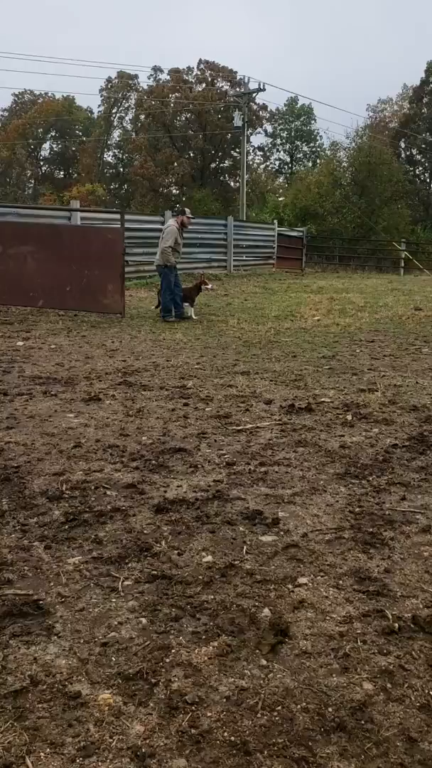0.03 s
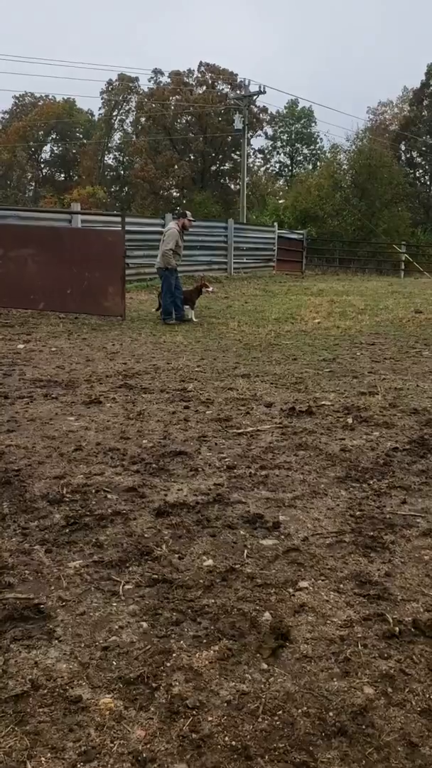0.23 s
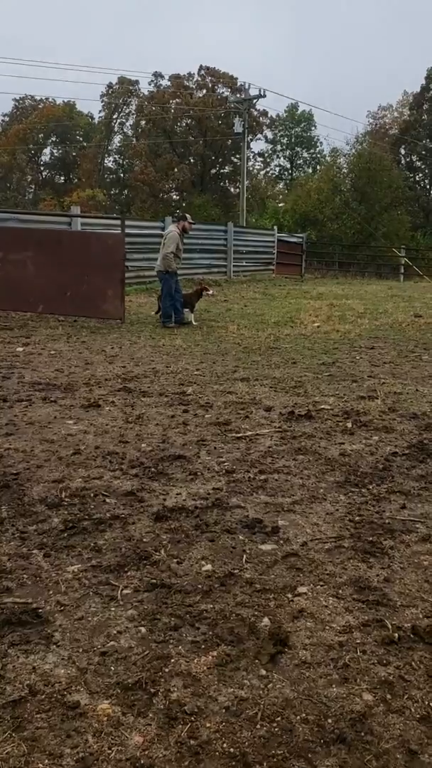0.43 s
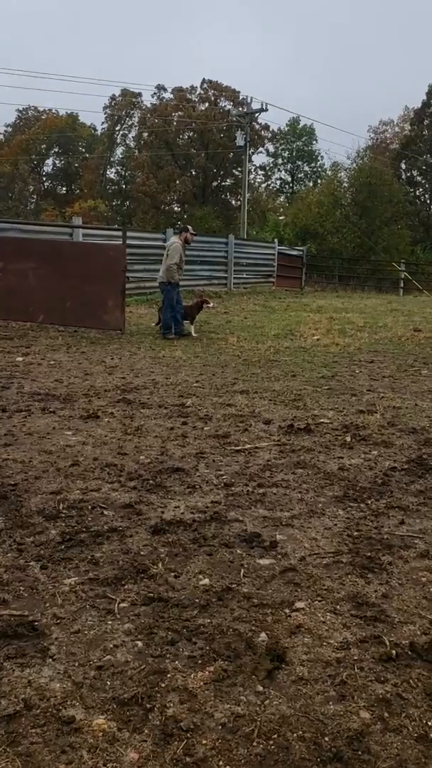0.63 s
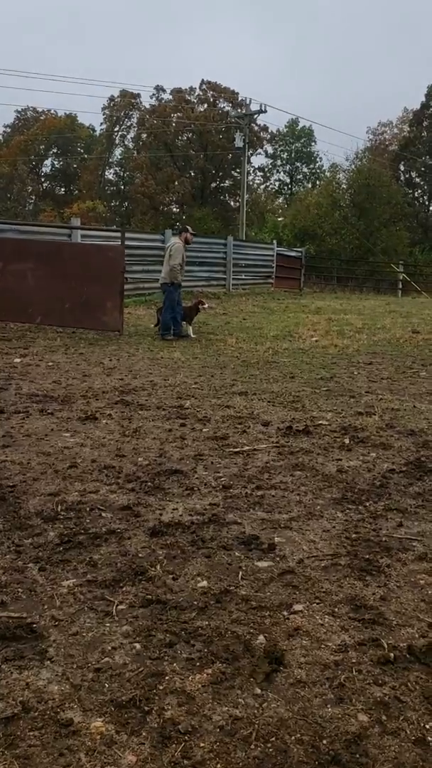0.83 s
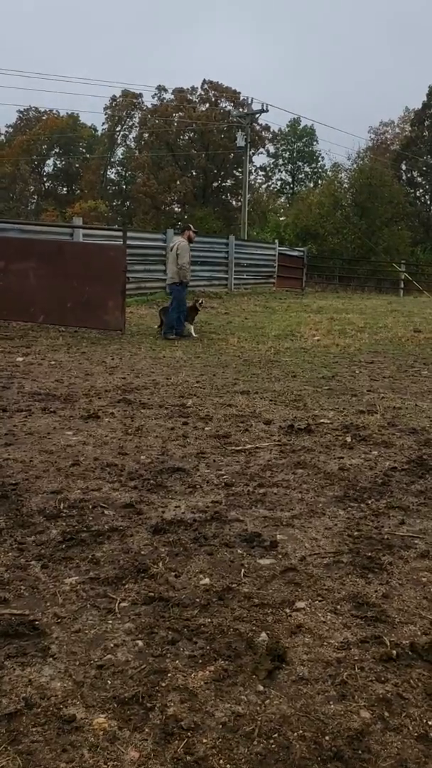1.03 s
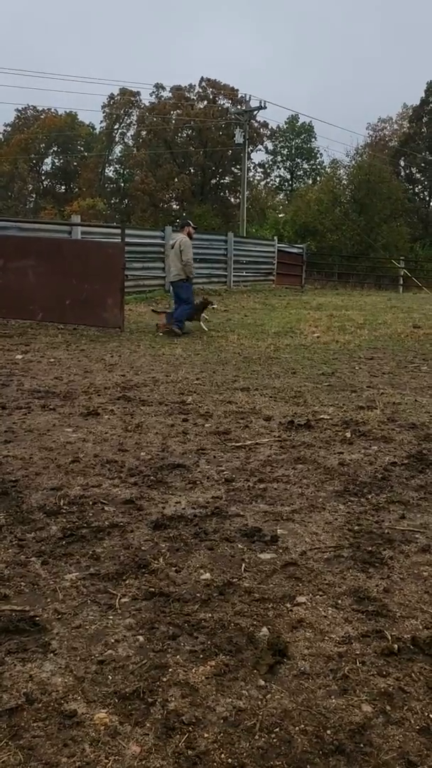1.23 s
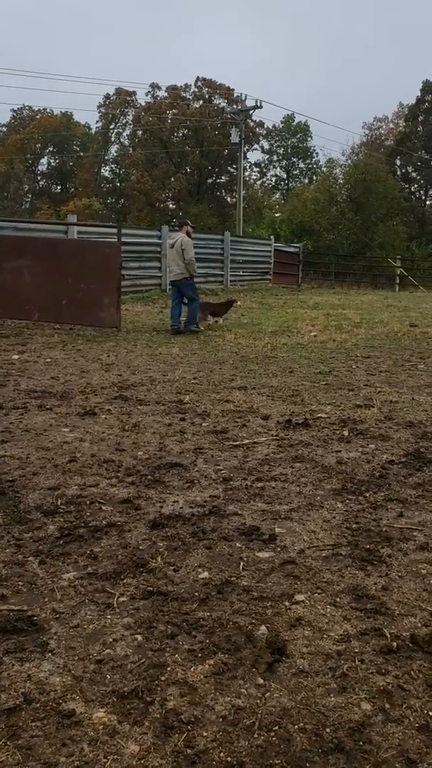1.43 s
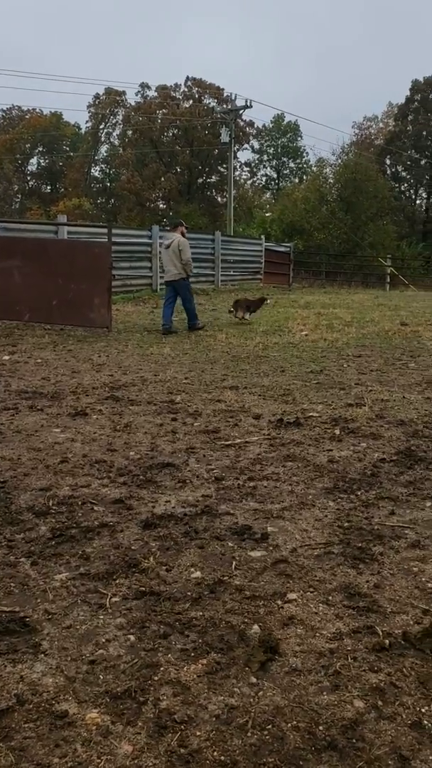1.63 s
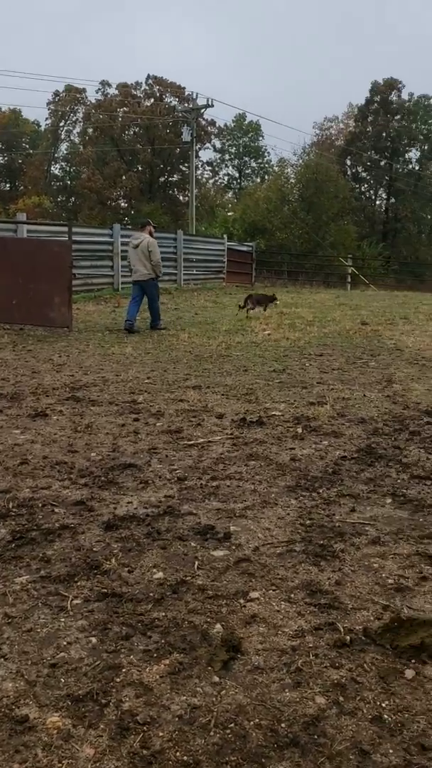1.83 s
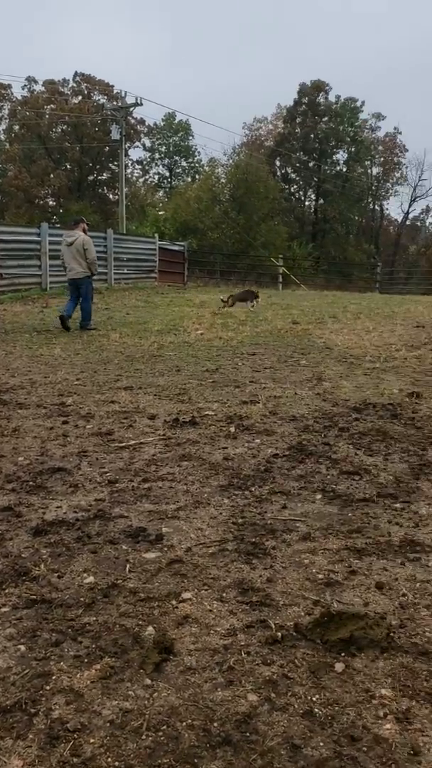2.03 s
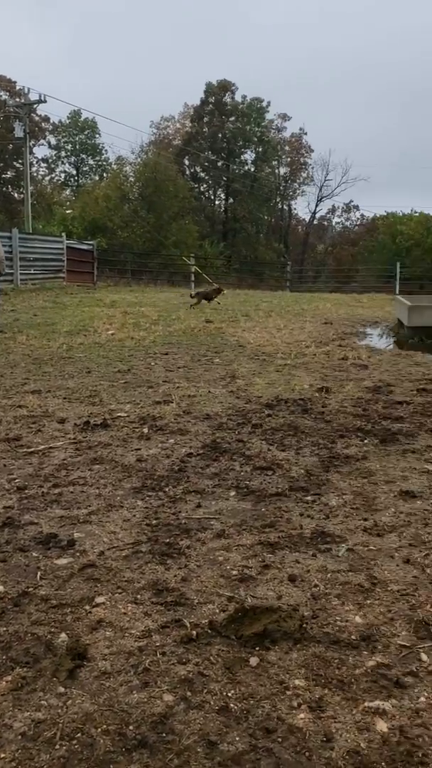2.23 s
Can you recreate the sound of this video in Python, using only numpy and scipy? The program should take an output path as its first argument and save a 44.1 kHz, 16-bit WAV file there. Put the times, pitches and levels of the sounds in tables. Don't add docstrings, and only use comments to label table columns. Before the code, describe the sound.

One cow's moo swells from a closed-mouth hum to a loud call, echoing across a farm lot

```python
import sys
import numpy as np
from scipy import signal
from scipy.fft import rfft, irfft, next_fast_len
from scipy.io import wavfile
from scipy.ndimage import uniform_filter1d, map_coordinates

SR = 44100
rng = np.random.default_rng(int(sys.argv[2]) if len(sys.argv) > 2 else 0)


def dump_mix(stems):
    frames = np.atleast_2d(stems).T
    limited = np.clip(frames, -1, 1)
    pcm = np.round(limited * 32767).astype(np.int16)
    wavfile.write(sys.argv[1], SR, pcm)


def undo_db(level):
    steps = np.asarray(level, float) / 20
    return 10 ** steps


N = 100856
TIME_S = np.arange(N) / SR


def unit(x):
    return x / np.sqrt(np.mean(x ** 2) + 1e-20)


def along(points, hz):
    point_hz, value = np.transpose(points)
    return np.interp(np.log(hz + 1), np.log(point_hz + 1), value)


def curves(rows):
    s, *columns = np.transpose(rows)
    return [uniform_filter1d(np.interp(TIME_S, s, c), size=881, mode="nearest") for c in columns]


def wobble(rate_hz):
    knots = rng.standard_normal(int(N * 400 / SR) + 4)
    return map_coordinates(knots, [np.arange(N) * min(rate_hz, 400) / SR])


def filtered(x, response):
    m = next_fast_len(N + SR)
    return irfft(rfft(x, m) * response(np.fft.rfftfreq(m, 1 / SR)), m)[..., :N]


def hiss(spectrum, channels=1):
    noise = rng.standard_normal((channels, N))
    return unit(filtered(noise, lambda hz: undo_db(along(spectrum, hz))))


# time_s, strength_db
GUSTS = [(0.07, -67.5), (0.1, -59.5), (0.71, -64.5), (1.24, -68.5), (1.26, -55), (1.46, -72.5), (1.53, -49),
         (1.58, -66), (2.06, -54.5), (2.11, -43.5), (2.21, -68.5), (2.28, -48)]
# freq_hz, level_db
THUMP_COLOUR = [(12, -33.5), (22, -9), (45, -14.5), (58, 0), (85, -8.5), (120, -10), (170, -19.5),
                (400, -41.5)]
# freq_hz, level_db
FAR_AIR = [(100, -8.5), (160, -8.5), (230, -31), (800, -38), (4500, -48.5), (8500, -51.5), (12000, -49),
           (15700, -42)]


def wind():
    far_air_db = -69.5
    strength_db, = curves(GUSTS)
    shared, left, right = hiss(THUMP_COLOUR + [(1500, -120)], channels=3)
    lumps = undo_db(0.28 * np.array([wobble(5.8), wobble(62)]))
    pair = np.array([.6 * shared + left, .6 * shared + 1.2 * right])
    thumps = undo_db(strength_db) * unit(lumps * pair)
    return thumps + undo_db(far_air_db) * hiss(FAR_AIR, channels=2)


# time_s, level_db
RUBBING = [(.07, -91), (.71, -86.5), (.78, -69.5), (.87, -68.5), (.92, -78.5), (1.05, -72.5), (1.16, -80),
           (1.2, -68.5), (1.5, -68.5), (1.85, -69), (1.93, -70.5), (2.03, -69.5), (2.08, -72),
           (2.15, -75.5), (2.22, -69.5), (2.29, -67)]
# freq_hz, level_db
FABRIC = [(200, -120), (500, 1), (1600, 3.5), (3700, -5.5), (6500, -4.5), (8600, -13), (11500, -4.5),
          (15700, -2.5)]


def cloth():
    left_db = -16
    swell = undo_db(curves(RUBBING)[0])
    slips = undo_db(0.41 * wobble(7.22) + 0.64 * wobble(81.0))
    return swell * slips * hiss(FABRIC, channels=2) * undo_db(np.array([[left_db], [0]]))


# start_s, peak_db
BUCKLE_TICKS = [
    (1.1964, -53.5),
    (1.4008, -66),
    (1.947, -62),
    (2.015, -49),
]
# freq_hz, level_db, t60_s
BUCKLE_MODES = [(9200, -20, .012), (10700, -21, .012), (12000, -10, 0.027), (13300, -9, .022),
                (15000, -19, .01)]


def buckle():
    rise_s, edge_hz, click_t60_s = .0012, 8800, .003
    out = np.zeros(N + SR)
    t = np.arange(SR // 10) / SR
    for start_s, peak_db in BUCKLE_TICKS:
        ring = 0
        for hz, level_db, t60_s in BUCKLE_MODES:
            decay = undo_db(level_db + rng.normal(0, 2) - 60 * t / t60_s)
            ring = ring + decay * np.sin(2 * np.pi * hz * t)
        click = 0.12 * undo_db(-60 * t / click_t60_s) * rng.standard_normal(len(t))
        rise = 1 - np.exp(-t / rise_s)
        out[round(start_s * SR):][:len(t)] += undo_db(peak_db - 2.0) * rise * (ring + click)
    thin = filtered(out[:N], lambda hz: 1 / (1 + (edge_hz / (hz + 1)) ** 8))
    return thin * undo_db(np.array([[-5], [4]]))


# delay_s, level_db, side (+ is left)
SLAPS = [
    (0.034, -12.5, .1),
    (.09, -25, -0.084),
    (0.172, -35.5, 0.29),
    (0.289, -26, -.1),
    (0.419, -25, .2),
    (0.923, -13.5, 0.065),
]
# freq_hz, t60_s
LOT_DECAY = [(100, 0.93), (300, 0.67), (520, 0.58), (1200, 1), (1900, 0.35), (2300, 0.78), (8000, 0.069)]
# freq_hz, level_db
LOT_COLOUR = [(170, -0.5), (340, -0.5), (520, -4.5), (850, 3), (1200, -1), (1900, -9), (2250, -3),
              (6000, -14)]


def lot(x):
    wide_hz, tail_db = 620, -15

    def wide(hz):
        return np.array([[1], [-1]]) / (1 + (wide_hz / (hz + 1)) ** 4)

    def answers(hz):
        return sum(undo_db(db) * (1 + side * wide(hz)) * np.exp(-2j * np.pi * hz * s) for s, db, side in SLAPS)

    coloured = filtered(x, lambda hz: undo_db(along(LOT_COLOUR, hz)))
    slaps = filtered(coloured, answers)
    hz, t, z = signal.stft(rng.standard_normal((2, SR)), SR, nperseg=256)
    z = z[:1] + wide(hz)[..., None] * z[1:]
    decay = undo_db(-60 * t / along(LOT_DECAY, hz)[:, None])
    tail = signal.istft(z * decay, SR, nperseg=256)[1]
    tail = tail / np.linalg.norm(tail[0])
    late = np.pad(coloured, (1500, 0))[None]
    return slaps + undo_db(tail_db) * signal.fftconvolve(late, tail, axes=1)[:, :N]


# freq_hz, left_minus_right_db
PORT_SHADING = [(60, 0), (200, .6), (380, -1.5), (700, -3), (1290, 1.5), (2380, .6), (4400, 3), (8000, 5)]


def ports(x):
    lead_s = 0.00012
    scatter, scatter_hz, scatter_t60_s = .6, 3300, .07
    side = np.array([[.5], [-.5]])
    t = np.arange(SR // 10) / SR
    bursts = rng.standard_normal((2, len(t))) * undo_db(-60 * t / scatter_t60_s)
    bursts = bursts / np.linalg.norm(bursts, axis=1, keepdims=True)

    def response(hz):
        treble = 1 / (1 + (scatter_hz / (hz + 1)) ** 6)
        scramble = 1 + scatter * treble * (rfft(bursts, 2 * len(hz) - 1) - .5)
        shading = undo_db(side * along(PORT_SHADING, hz))
        return scramble * shading * np.exp(2j * np.pi * hz * lead_s * side)

    return filtered(x, response)


def throat(peaks, hz):
    steep = 1.606
    total = 0
    for k, (centre_hz, width_hz, db) in enumerate(peaks):
        damping = 1j * hz * width_hz
        resonance = damping / (centre_hz * centre_hz - hz * hz + damping)
        total = total + (-1) ** k * undo_db(db) * resonance ** steep
    return total


def gated_noise(gate, share, response):
    return unit(filtered((1 - share + share * gate) * rng.standard_normal(N), response))


# freq_hz, level_db
NOSE_BREATH = [(1000, -47), (2500, -20.5), (4500, -30.5), (5600, -12.5), (6800, -5), (7600, -12.5),
               (8300, -33), (9000, -120)]
# freq_hz, level_db
MOUTH_BREATH = [(1800, -31), (2900, -5), (3500, -16.5), (4000, -20.5), (4700, -10.5), (5800, -12.5),
                (7600, -26), (8400, -43.5)]


def breath(mouth, gate):
    share = .4
    nose_air = gated_noise(gate, share, lambda hz: undo_db(along(NOSE_BREATH, hz)))
    mouth_air = gated_noise(gate, share, lambda hz: undo_db(along(MOUTH_BREATH, hz)))
    return nose_air * (1 - mouth) ** 2 + mouth_air * mouth


# centre_hz, width_hz, level_db
THROAT_SHUT = [(88.4, 35.4, 5), (314, 100, -14), (516, 67, -14), (1494, 82, -23), (2437, 390, -29),
               (2505, 110, -18.5), (4000, 290, -65.5), (5300, 600, -67), (165, 35, -8), (690, 61, -28.5),
               (2900, 220, -69), (5800, 200, -67)]
# centre_hz, width_hz, level_db
THROAT_HALF = [(140, 54, -2), (258, 130, -2.5), (808, 168, -16.5), (1390, 1250, -25), (1967, 108, -7.5),
               (2454, 180, -25), (4640, 370, -69), (5340, 820, -35), (210, 55, -53), (1560, 220, -55.5),
               (3070, 67, -45.5), (5540, 200, -64)]
# centre_hz, width_hz, level_db
THROAT_OPEN = [(150, 166, 3), (544, 140, 2), (917, 106, -12.5), (1285, 850, -15.5), (1918, 156, -5.5),
               (2508, 143, -13), (4670, 680, -44), (5060, 200, -37.5), (200, 40, -55), (2322, 140, -12.5),
               (2990, 82, -30), (5600, 66, -44)]
# time_s, upper_resonance_shift_percent, middle_overtones_db, upper_overtones_db
OVERTONE_MOVES = [(.07, 0, -6.5, -5), (.9, 1.5, 10, -1), (.96, -1, -5, 8.5), (1.02, 4.5, -8, -4),
                  (1.08, 1, -3.5, 5.5), (1.14, -1.5, -1.5, 1), (1.21, -3, 0.5, 0.5), (1.3, -0.5, -3.5, 2.5),
                  (1.38, 0.5, -7.5, -4.5), (1.45, -1.5, 3.5, 2.5), (1.55, 0, 0, -1), (1.65, -2, -6, -1),
                  (1.73, 0, -4.5, 0), (1.86, -2.5, -6, 2), (1.93, 3, 0.5, -1), (2.0, -1, 1, 4.5),
                  (2.05, -5, -13.5, -1), (2.1, -8, 1, -5)]


def rasp(mouth, gate):
    half_open = gated_noise(gate, 1, lambda hz: throat(THROAT_HALF, hz))
    wide_open = gated_noise(gate, 1, lambda hz: throat(THROAT_OPEN, hz))
    return half_open * (1 - mouth) + wide_open * mouth


def vocal_folds(pitch_hz, turns, mouth, rough, fundamental_db, lips_db):
    middle_hz, middle_wide_hz, upper_hz, top_hz = 870, 244, 1600, 6100
    strain_hz, strain_db, blur = 3900, 11, 1.7
    step = slice(0, N, 64)
    shift, middle_db, upper_db = (c[step] for c in curves(OVERTONE_MOVES))
    peaks = []
    for shapes in zip(THROAT_SHUT, THROAT_HALF, THROAT_OPEN):
        centre_hz, width_hz, db = (np.interp(mouth[step], [0, .5, 1], v) for v in zip(*shapes))
        centre_hz = centre_hz * (1 + shift / 100 * (centre_hz > middle_hz))
        peaks.append((centre_hz, width_hz, db))

    k = np.arange(1, 45)[:, None]
    overtone_hz = k * pitch_hz[step]

    def above(edge_hz):
        return 1 / (1 + (edge_hz / overtone_hz) ** 6)

    push_db = np.interp(TIME_S[step], (1.84, 1.88, 1.99, 2.04), [0, strain_db, strain_db, 0])
    middle = np.exp(-((overtone_hz - middle_hz) / middle_wide_hz) ** 2)
    gain = throat(peaks, overtone_hz) * (1 - above(top_hz))
    gain = gain * undo_db(push_db * above(strain_hz) + lips_db[step] * above(420))
    gain = gain * undo_db(middle_db * middle + upper_db * above(upper_hz))
    drift = uniform_filter1d(rng.standard_normal((2, *gain.shape)), size=9, axis=2) * 3
    wander = 1 + blur * rough[step] * np.tanh(k / 6) * (drift[0] + 1j * drift[1])
    gain = -gain * wander * np.where(k == 1, undo_db(fundamental_db[step]), 1)
    gain = gain / np.sqrt(np.sum(abs(gain) ** 2, axis=0) / 2)

    now = np.arange(N)
    voice = np.zeros(N)
    for n, g in zip(k[:, 0], gain):
        voice += np.interp(now, now[step], g.real) * np.cos(n * turns)
        voice -= np.interp(now, now[step], g.imag) * np.sin(n * turns)
    return voice


# time_s, pitch_hz, level_db
CALL_LINE = [(0.07, 74.65, -70.5), (0.15, 76.2, -71.5), (0.6, 80.35, -68), (0.84, 87.17, -64),
             (0.98, 91.4, -68.5), (1.01, 97.1, -59.5), (1.04, 104.5, -53.5), (1.18, 138, -42),
             (1.23, 148.8, -40.5), (1.26, 152.7, -47.5), (1.33, 158.3, -40), (1.41, 166.9, -37),
             (1.53, 172.9, -39.5), (1.66, 175.7, -37), (1.82, 176.6, -37.5), (1.94, 172.7, -35.5),
             (2.0, 168.2, -35), (2.035, 162.3, -36), (2.08, 134.9, -40), (2.13, 87.8, -54),
             (2.14, 79.6, -68), (2.15, 76, -57)]
# time_s, opening_0_to_1, breath_db, roughness_0_to_1, fundamental_db
MOUTH_MOVES = [(.07, 0, -88, 0, 1.5), (.7, 0.02, -83.5, 0.25, 4.5), (.9, 0.01, -84, 0.28, -9.5),
               (.98, 0.32, -78, 0.25, 2), (1.08, 0.58, -69.5, 0.28, -3.5), (1.16, 0.44, -69, 0.24, -2),
               (1.22, 0.65, -61, 0.25, 10), (1.27, 0.65, -62, 0.26, -14), (1.33, 0.76, -63.5, 0.05, -1),
               (1.45, 0.93, -63, 0.06, 4.5), (1.62, 0.96, -65.5, 0.06, -0.5), (1.8, 0.98, -64.5, 0.08, -3),
               (1.88, 0.89, -67.5, 0.08, -5), (2.0, 0.87, -70, 0.11, 1), (2.05, 0.69, -60.5, 0.24, -7),
               (2.085, 0.48, -67, 0.18, 4), (2.105, 0.34, -71, 0.06, -10), (2.15, 0.44, -67, 0.13, 1)]


def cow():
    jitter, shimmer_db, flutter_db = .008, .9, 1.3
    rasp_db, hoarse, gate_sharp = -37, 1.1, 1
    lips_s, lips_take_s, lips_shut_db = 2.075, .03, -24
    pocket_hz, pocket_wide_hz, pocket_db = 3500, 320, -7
    pitch_hz, level_db = curves(CALL_LINE)
    mouth, breath_db, rough, fundamental_db = curves(MOUTH_MOVES)
    mouth = np.clip(mouth, 0, 1)
    lips_db = lips_shut_db * np.clip((TIME_S - lips_s) / lips_take_s, 0, 1)
    turns = 2 * np.pi * np.cumsum(pitch_hz * (1 + jitter * rough * wobble(70))) / SR
    gate = np.exp(gate_sharp * (np.cos(turns - 1) - 1))

    voice = vocal_folds(pitch_hz, turns, mouth, rough, fundamental_db, lips_db)
    rasp_level = (undo_db(rasp_db) + hoarse * rough ** 2) * undo_db(lips_db)
    loudness = undo_db(level_db + shimmer_db * (.3 + 4 * rough) * wobble(45))
    body = loudness * (voice + rasp_level * rasp(mouth, gate))
    alive = np.clip((CALL_LINE[-1][0] - TIME_S) / 0.014, 0, 1)
    air = undo_db(breath_db + flutter_db * wobble(36)) * breath(mouth, gate)

    def pocket(hz):
        return undo_db(pocket_db * np.exp(-((hz - pocket_hz) / pocket_wide_hz) ** 2))

    return filtered(alive * body + air, pocket)


def scene():
    call = cow()
    return wind() + cloth() + buckle() + lot(call) + ports(call)


def roll_off(x):
    return signal.sosfilt(signal.butter(12, 15850, fs=SR, output="sos"), x)


def record(dry):
    start_s, fade_s, band_hz = 0.065, 0.0024, 15850
    opening = np.clip((TIME_S - start_s) / fade_s, 0, 1)
    kept = filtered(dry, lambda hz: hz < band_hz) * opening
    return roll_off(kept)


dry = scene()
out = record(dry)
dump_mix(out)
```